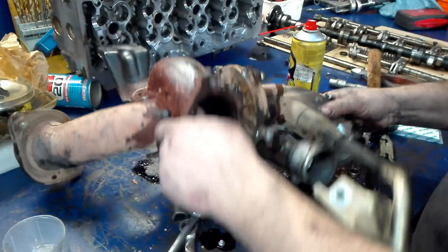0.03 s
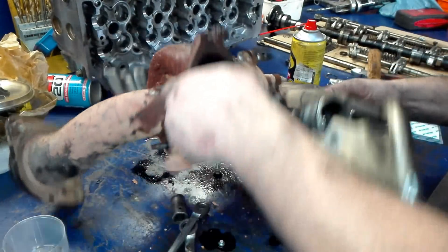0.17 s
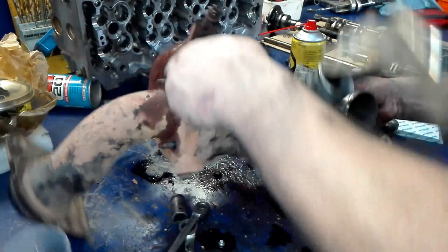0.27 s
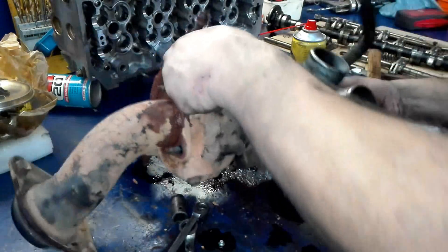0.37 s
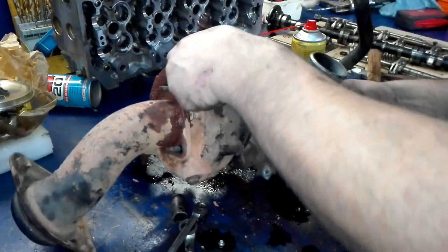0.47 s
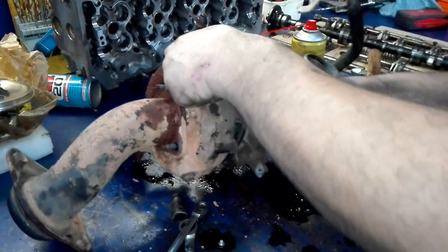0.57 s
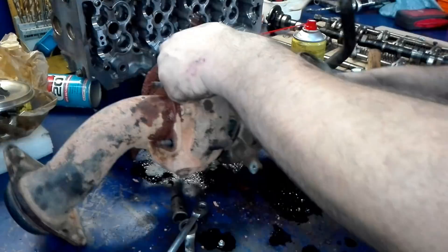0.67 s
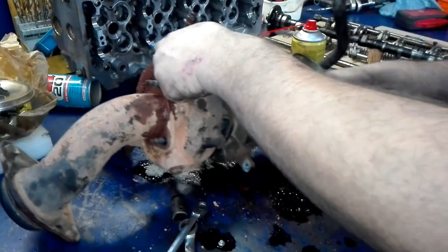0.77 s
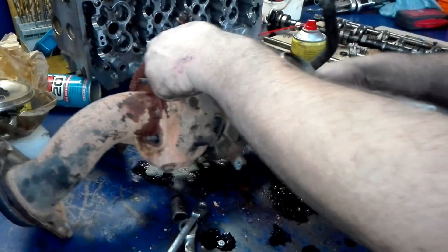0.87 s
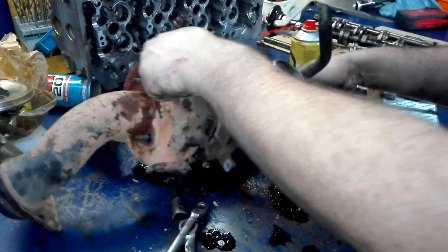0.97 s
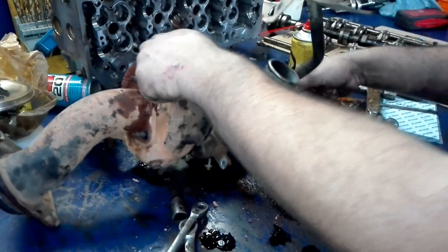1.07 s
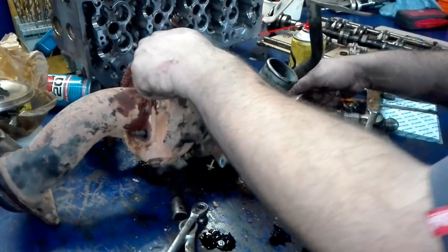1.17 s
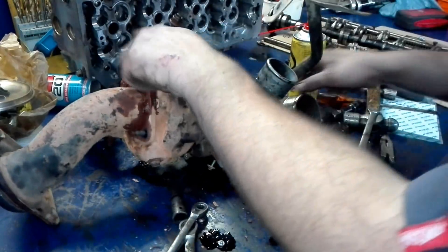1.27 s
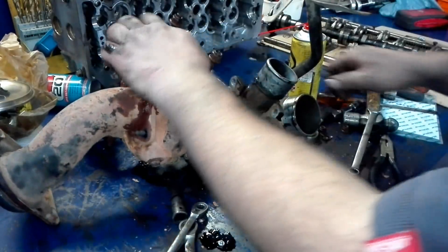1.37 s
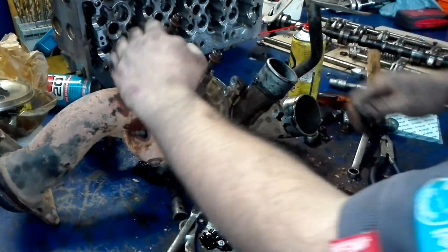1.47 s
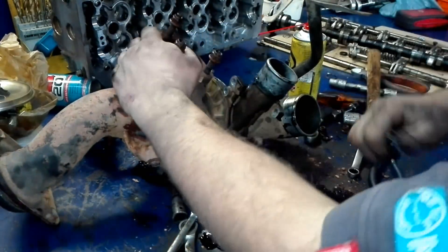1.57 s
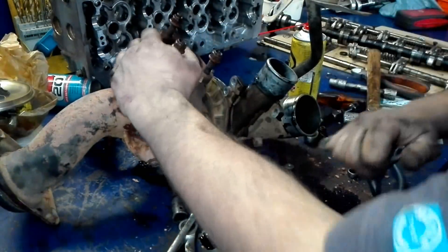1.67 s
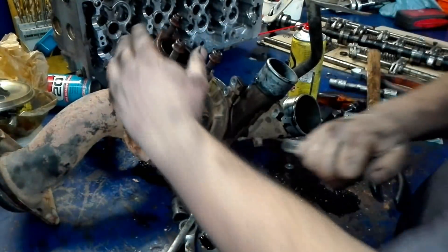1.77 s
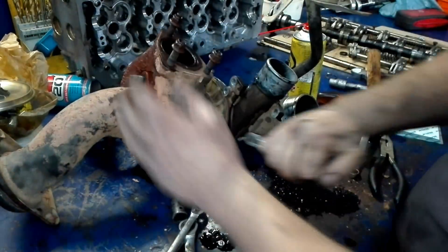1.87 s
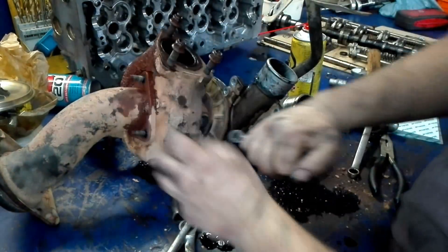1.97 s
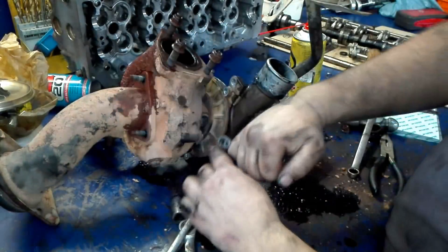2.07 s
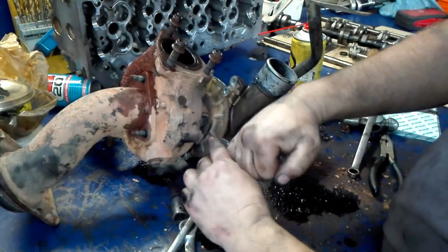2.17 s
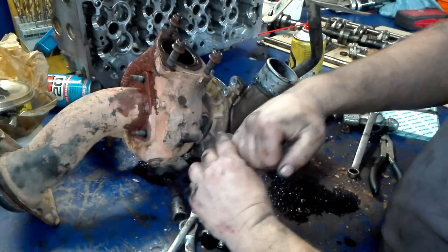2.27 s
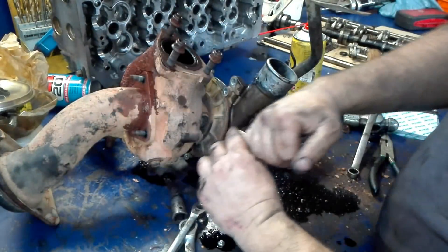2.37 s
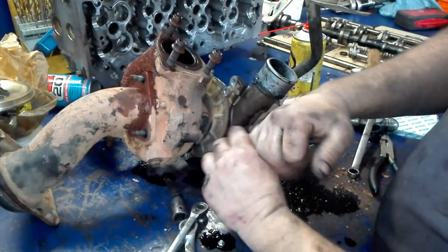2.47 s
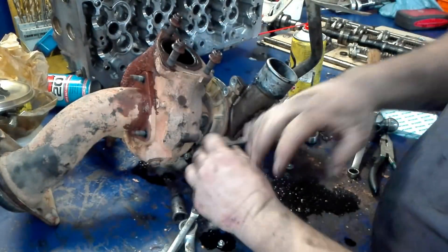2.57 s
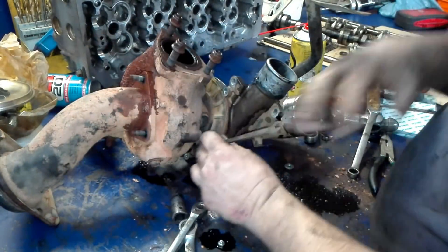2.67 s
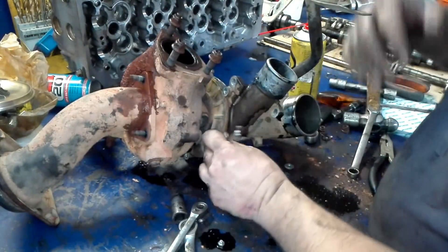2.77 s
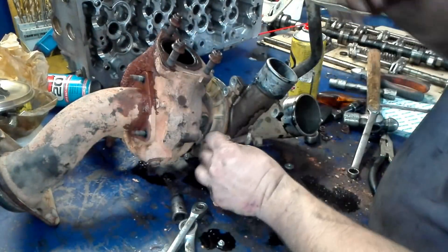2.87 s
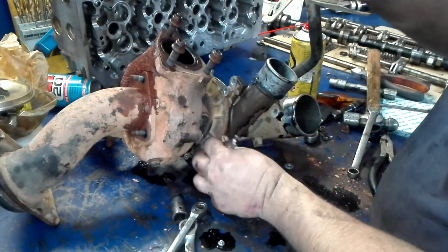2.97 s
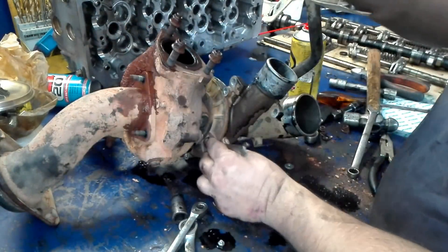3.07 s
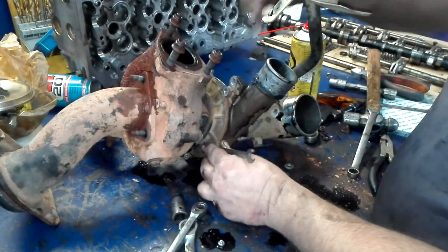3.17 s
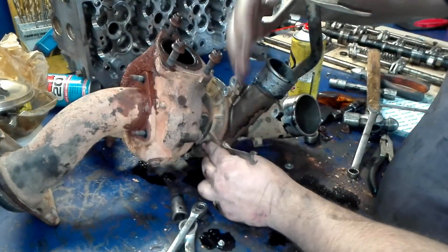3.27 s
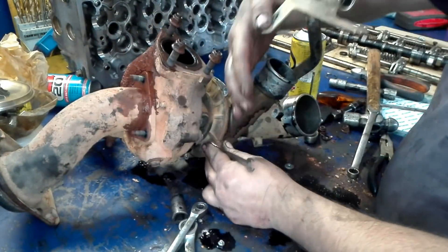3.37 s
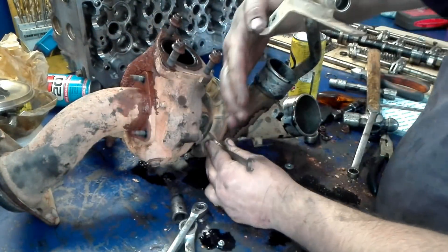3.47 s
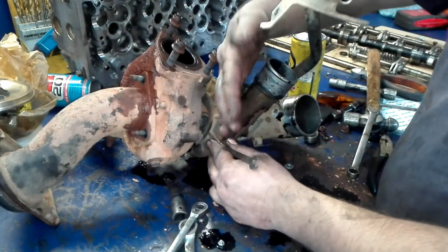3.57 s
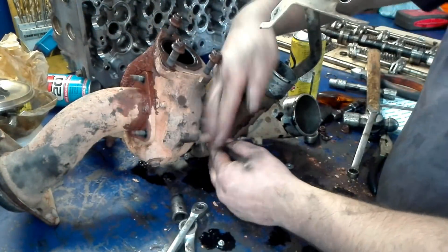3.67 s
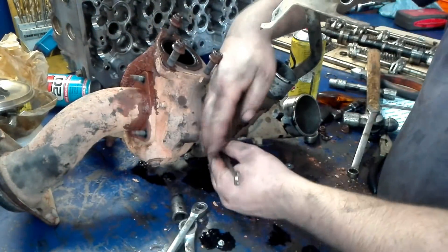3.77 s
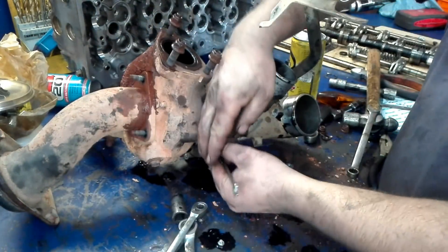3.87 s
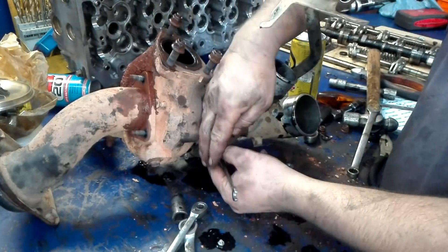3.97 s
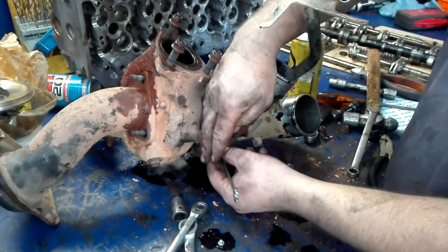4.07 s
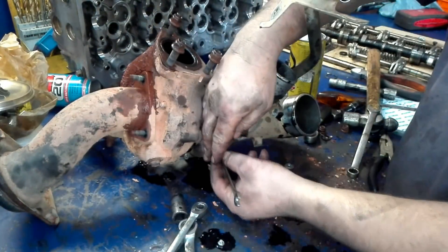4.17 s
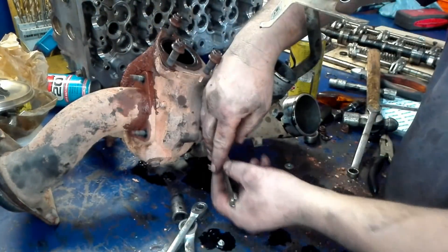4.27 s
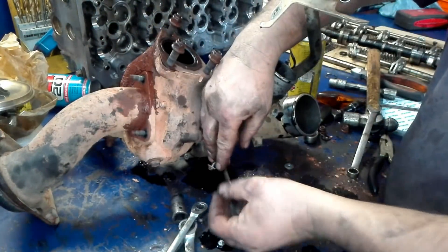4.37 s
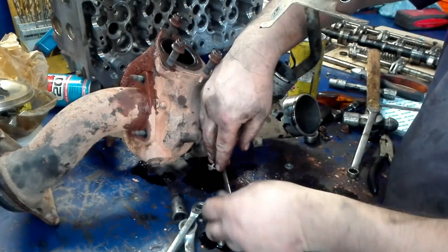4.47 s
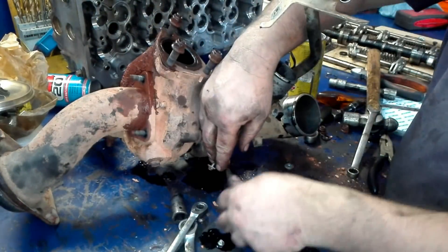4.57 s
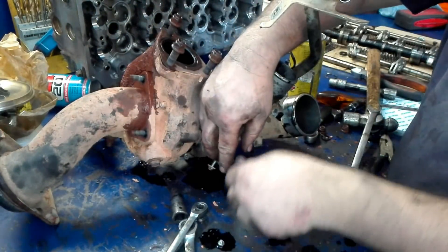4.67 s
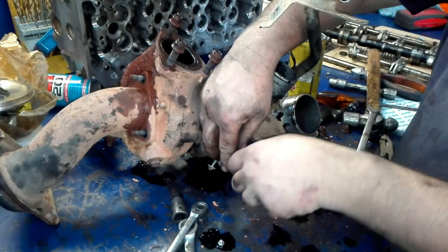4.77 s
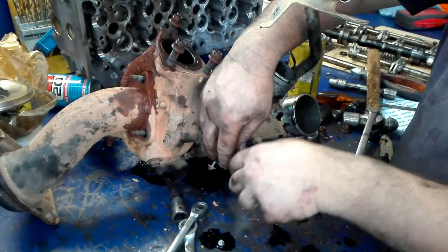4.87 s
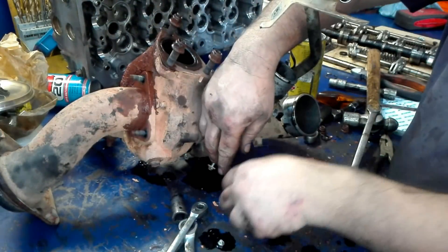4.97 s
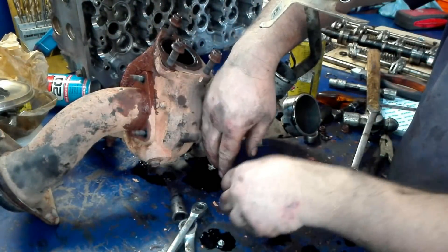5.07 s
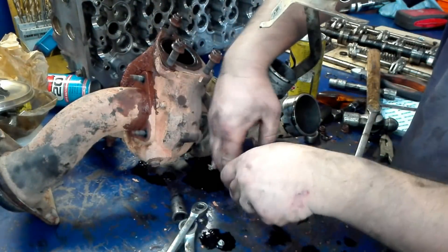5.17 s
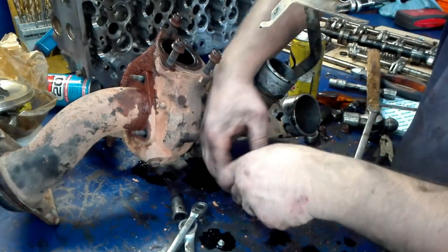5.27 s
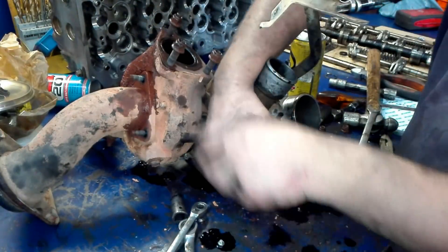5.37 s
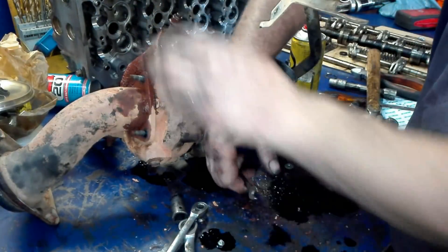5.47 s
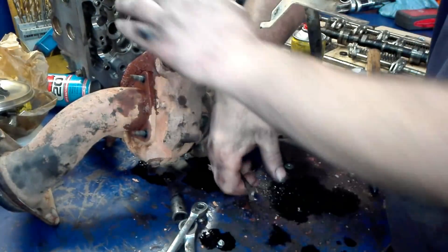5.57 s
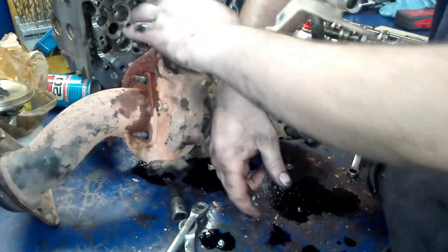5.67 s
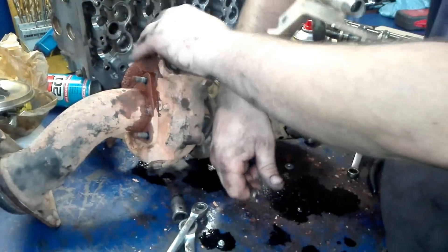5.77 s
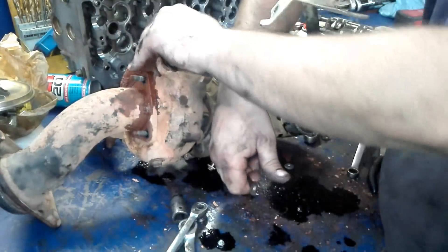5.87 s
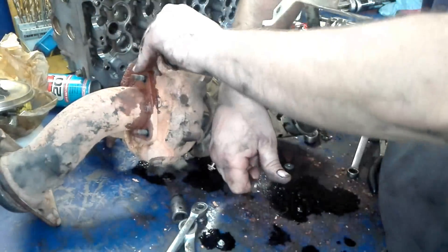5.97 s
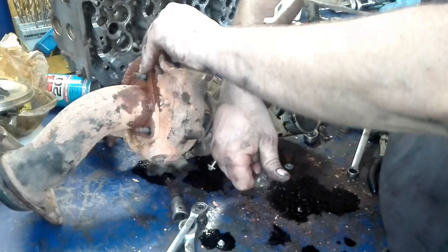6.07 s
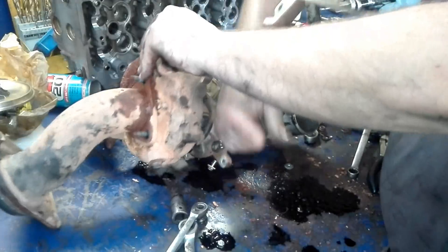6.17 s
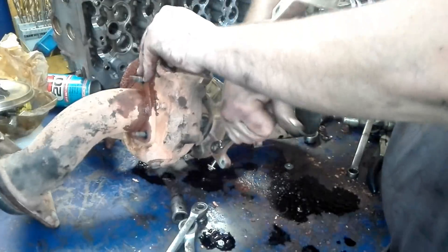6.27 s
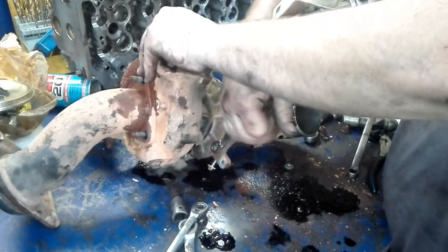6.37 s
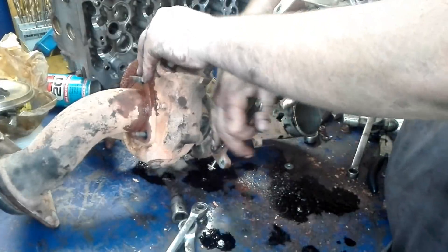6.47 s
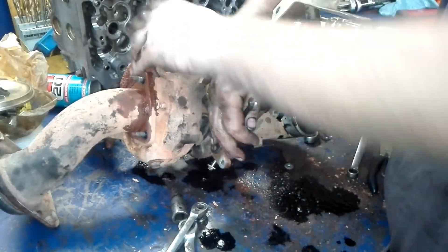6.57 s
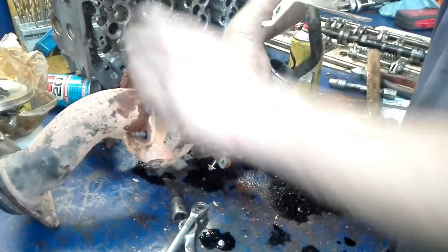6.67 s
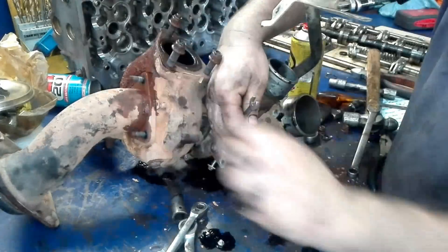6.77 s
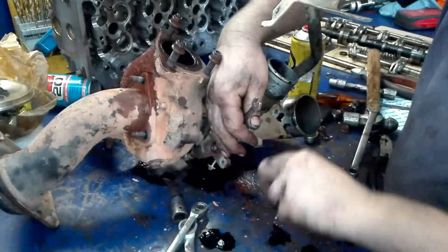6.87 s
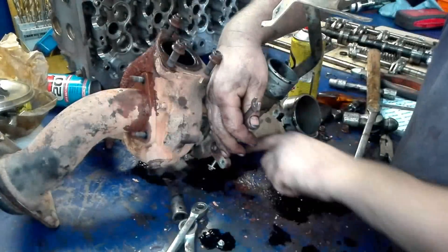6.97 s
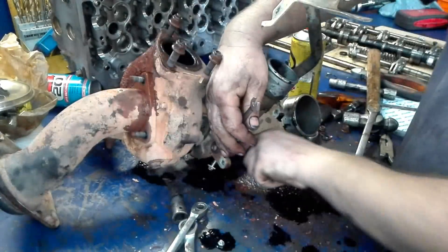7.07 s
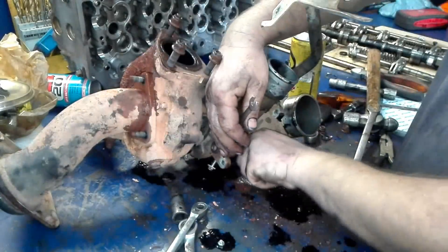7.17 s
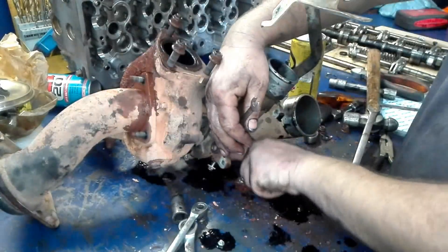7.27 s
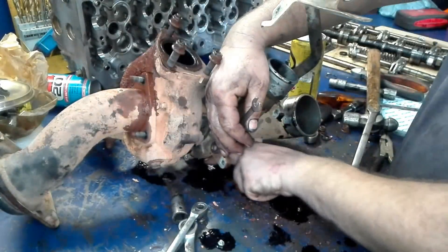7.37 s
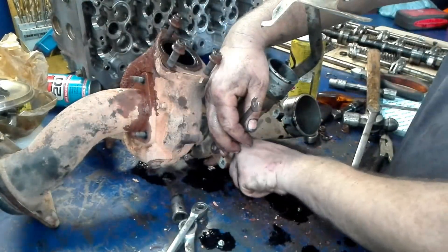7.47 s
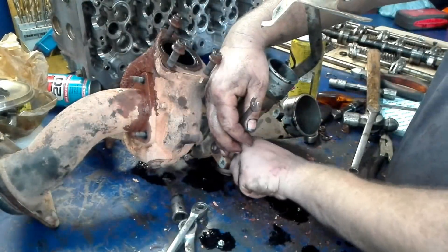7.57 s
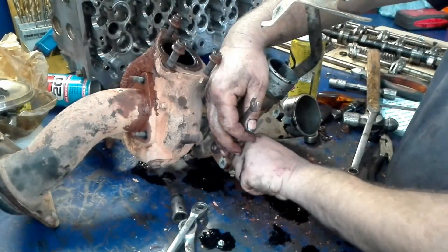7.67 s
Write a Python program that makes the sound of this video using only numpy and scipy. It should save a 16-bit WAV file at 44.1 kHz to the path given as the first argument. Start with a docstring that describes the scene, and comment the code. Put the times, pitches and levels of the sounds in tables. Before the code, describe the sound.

A heavy cast-iron housing is dragged over a workbench, grinding, knocking and landing twice with ringing clashes and low booms. After a lull with faint sleeve rustle come light spanner taps, soft bumps and tiny bolt clicks. The housing rocks and bangs down once more, and a tool clacks farther off. The microphone is close, in a quiet, hard-walled workshop with a short echo.

```python
"""A hard-walled workshop, with a small microphone close to the workbench.
A cast-iron turbo housing is dragged, tipped over and dropped: it grinds as it sticks and slips, each
landing clashes and rings, and the bench top booms under the blows. Then a spanner and bolts tap on it,
the housing rocks and bangs down once more, and a tool clacks farther off. The walls answer."""
import sys
import numpy as np
from scipy import signal
from scipy.fft import rfft, irfft, next_fast_len
from scipy.io import wavfile
from scipy.ndimage import uniform_filter1d, map_coordinates

SR = 44100
rng = np.random.default_rng(int(sys.argv[2]) if len(sys.argv) > 2 else 0)


def bounce(signal):
    """Save signal as a 16-bit WAV file at the path given by the first command-line argument."""
    frames = np.transpose(np.atleast_2d(signal))
    limited = np.clip(frames, -1, 1)
    pcm = np.round(limited * 32767).astype(np.int16)
    wavfile.write(sys.argv[1], SR, pcm)


N = 340893


def amp(db):
    return 10 ** (np.asarray(db) / 20)


def unit(x):
    return x / np.sqrt(np.mean(x ** 2) + 1e-20)


def unit_attack(x):
    """Scale a blow to rms 1 over its first 20 ms."""
    return x / np.sqrt(np.mean(x[..., :SR // 50] ** 2) + 1e-20)


def along(points, hz):
    """Interpolate (Hz, value) points on a log frequency axis."""
    knots_hz, values = np.transpose(points)
    return np.interp(np.log(hz + 1), np.log(knots_hz + 1), values)


def filtered(x, response):
    """Apply a gain given as a function of frequency."""
    size = x.shape[-1]
    padded = next_fast_len(size + 8192)
    hz = np.fft.rfftfreq(padded, 1 / SR)
    return irfft(rfft(x, padded) * response(hz), padded)[..., :size]


def noise(colour, size=N):
    """Mid and side noise of rms 1; colour gives dB for each frequency."""
    return unit(filtered(rng.standard_normal((2, size)), lambda hz: amp(colour(hz))))


def wobble(rate):
    """A smooth random curve, rate knots a second."""
    knots = rng.standard_normal(int(N * rate / SR) + 4)
    return map_coordinates(knots, [np.arange(N) * rate / SR])


def treble(hz, db):
    """A slope above 2.5 kHz that reaches db near 6 kHz."""
    return db * 0.54 * np.log1p((hz / 2500) ** 2)


def dying(colour, t60s):
    """One second of coloured noise; each frequency dies at its own speed."""
    hz, t, bands = signal.stft(noise(colour, size=SR), SR, nperseg=128)
    decay = amp(-60 * t / along(t60s, hz)[:, None])
    return signal.istft(bands * decay, SR, nperseg=128)[1][:, :SR]


def burst(spectrum, t60s):
    """The noise of one blow, from (Hz, dB) and (Hz, seconds) points."""
    return unit_attack(dying(lambda hz: along(spectrum, hz), t60s))


def ring(modes, scatter_db, colour=np.zeros_like):
    """One second of damped modes, at new strengths for each blow."""
    hz, db, t60 = np.transpose(modes)
    t = np.arange(SR) / SR
    gains = amp(db + colour(hz) + scatter_db * rng.standard_normal((2, len(hz))))
    partials = np.sin(2 * np.pi * hz[:, None] * t) * amp(-60 * t / t60[:, None])
    return unit_attack(gains @ partials)


def swell(x, rise_s):
    """Let a sound build up with time constant rise_s."""
    return x * (1 - np.exp(-np.arange(x.shape[-1]) / SR / rise_s))


def push(s, build_up_s, let_go_s):
    """Effort that grows exponentially to 1 at time s and then dies away."""
    t = np.arange(N) / SR - s
    return np.exp(-np.maximum(-t / build_up_s, t / let_go_s))


def add(track, s, sound):
    """Mix a sound in at time s."""
    part = track[:, round(s * SR):][:, :sound.shape[1]]
    part += sound[:, :part.shape[1]]


# The walls around the bench. Each row: frequency in Hz, time to fall 60 dB (t60) in seconds.
SHOP_DECAY = [(60, 0.92), (200, 0.56), (700, 0.64293), (1500, 0.76), (4000, 0.68), (7000, 0.45),
              (12000, 0.17)]

def in_shop(x, wet_db):
    """The direct sound reaches the microphone, and a diffuse tail builds up as the walls answer."""
    tail = swell(dying(lambda hz: treble(hz, -2.5), SHOP_DECAY), rise_s=0.004)
    tail /= np.linalg.norm(tail[0])
    return x + amp(wet_db) * signal.fftconvolve(x, tail, axes=1)[:, :x.shape[1]]


# The quiet shop around the microphone. Each row: frequency in Hz, relative density in dB.
ROOM_SPECTRUM = [(12, -28), (20, 6.5), (64, -4.5), (82, -13.5), (118, -11.5), (357, -25.5), (398, -27.5),
                 (638, -30.5), (841, -31.5), (1210, -27.5), (1420, -31), (3270, -33.5), (3760, -33.5),
                 (13400, -39.5), (15000, -54.5)]

def room_tone():
    """Low wavering rumble and faint hiss."""
    air = noise(lambda hz: along(ROOM_SPECTRUM, hz))
    rumble = filtered(air, lambda hz: 1 / (1 + (hz / 200) ** 4))
    return amp(-52.5) * (air + rumble * (amp(wobble(2.2)) - 1))


# Sleeves and hands at the bench. Each row: centre in seconds, level in dB, half-width in seconds.
SLEEVE_STROKES = [(1.563, -63.5, .04), (2.002, -64.5, .22), (3.2, -64, 0.0506), (3.545, -63.5, .08),
                  (3.682, -66, 0.091), (5.24, -68, 0.192), (6.569, -64, .04)]
# Their soft hiss. Each row: frequency in Hz, relative density in dB.
SLEEVE_SPECTRUM = [(300, -9), (700, -2), (1300, 2.5), (2500, -4), (5000, -5.5), (8000, -12), (14000, -25)]

def rustle():
    """Soft swells of cloth and skin sliding over the parts."""
    t = np.arange(N) / SR
    strokes = sum(amp(db) * np.exp(-((t - s) / width) ** 2) for s, db, width in SLEEVE_STROKES)
    return strokes * amp(0.83 * wobble(30)) * noise(lambda hz: along(SLEEVE_SPECTRUM, hz))


# A tool put down farther from the microphone. Each row: start in seconds, relative level in dB.
TOOL_CLACKS = [(7.622, -42.5), (7.629, -36.5), (7.635, -35.5), (7.647, -36.5), (7.656, -42.5)]
# Its clack. Each row: frequency in Hz, relative density in dB.
TOOL_SPECTRUM = [(210, -32), (350, -15), (768, 0.5), (1190, -11), (1420, -3.5), (2170, -13.5), (2500, -8.5),
                 (2790, -12.5), (3060, -11.5), (4540, -15.5), (7160, -14), (9360, -22), (13600, -40),
                 (14300, -35), (15000, -61.5)]
# Its ring. Each row: frequency in Hz, relative level in dB, t60 in seconds.
TOOL_MODES = [(688.7, 5, 0.03), (782, -21, 0.041), (1365, -8, 0.082), (1480, -5, 0.048), (1818, 0.5, 0.031),
              (3138, -7, 0.11), (6230, -12, 0.13), (7169, -16, .07)]

def tool_down():
    """A tool settles in a quick run of hollow clacks."""
    out = np.zeros((2, N))
    for s, db in TOOL_CLACKS:
        clack = amp(-0.5) * burst(TOOL_SPECTRUM, t60s=[(1000, 0.066), (12000, 0.048)])
        ringing = amp(-6) * ring(TOOL_MODES, scatter_db=3)
        add(out, s, amp(db) * swell(clack + ringing, rise_s=0.00187))
    return in_shop(out, wet_db=-11)


# Small bolts click together on the bench. Each row: start in seconds, relative level in dB.
BOLT_CLICKS = [(5.019, -43), (5.0511, -46), (6.1816, -53.5), (6.198, -56.5)]
# One click. Each row: frequency in Hz, relative density in dB.
BOLT_SPECTRUM = [(1470, -57), (2500, -33.5), (2900, -22.5), (3200, -21), (4070, -16.5), (4690, 3),
                 (5970, -14.5), (6980, -4), (9280, -25), (10000, -12.5), (10700, -7), (14600, -22.5),
                 (15000, -33.5)]

def bolts():
    """Tiny steel contacts, too damped to hold a pitch."""
    out = np.zeros((2, N))
    for s, db in BOLT_CLICKS:
        add(out, s, amp(db - 4.5) * burst(BOLT_SPECTRUM, t60s=[(4000, 0.031), (12000, 0.036)]))
    return in_shop(out, wet_db=-13)


# Steel taps the casting, close by. Each row: start in seconds, relative level in dB, treble in dB.
SPANNER_TAPS = [(0.3127, -20.5, -0.5), (0.3632, -19.5, 1.5), (0.37, -24.5, 3), (2.953, -37.5, -8.5),
                (3.222, -46.5, -9), (3.9356, -38.5, 6), (3.940, -44.5, 9), (4.213, -62, 6), (4.322, -57, 0),
                (4.740, -55, 2.5), (4.7631, -54, 7.5)]
# The tick of contact. Each row: frequency in Hz, relative density in dB.
TICK_SPECTRUM = [(300, -8), (850, -18), (1350, 0), (2100, -17.5), (3300, -6.5), (6800, -11.5),
                 (9000, -25.5), (14000, -34)]
# The ring each tap sets off, loudest in the casting near 1.35 kHz. Each row: frequency in Hz, relative level in
# dB, t60 in seconds.
TAP_MODES = [(397, -8.5, 0.24), (532, -9.5, .07), (1260, -8.5, 0.0083), (1350, -2, .028),
             (1370, 8, 0.035), (1830, -9, .025), (3090, -8, 0.023), (4360, -7, 0.062),
             (5100, -5.5, 0.045), (6700, -7.5, 0.0083), (6420, -0.5, .035), (11000, -17, .02)]

def spanner():
    """Taps of hand-damped steel on the casting: a tick and a brief ring."""
    out = np.zeros((2, N))
    for s, db, treble_db in SPANNER_TAPS:
        tick = burst(TICK_SPECTRUM, t60s=[(300, 0.0667), (8000, 0.052)])
        tap = swell(0.5 * tick + ring(TAP_MODES, scatter_db=2.5), rise_s=0.0011)
        add(out, s, amp(db - 3) * filtered(tap, lambda hz: amp(treble(hz, treble_db))))
    return in_shop(out, wet_db=-14)


# The dragged iron catches on the bench top. Each row: peak time in seconds, level in dB.
CATCHES = [(.045, -34), (.165, -25.5), (.3, -29), (.385, -30)]

def groan():
    """Stick-slip locks loosely on to one bench mode and its overtone."""
    effort = sum(amp(db) * push(s, build_up_s=0.012, let_go_s=0.051) for s, db in CATCHES)
    pitch_hz = 226 * (1 + 0.073 * wobble(70))
    phase = 2 * np.pi * np.cumsum(pitch_hz) / SR
    tone = np.sin(phase) + amp(-12.5) * np.sin(2 * phase)
    return effort * unit(tone * amp(3.6 * wobble(68)))


# The iron is pushed along the bench, close to the microphone. Each row: time of the hardest push in
# seconds, relative grind and grit levels in dB, build-up and let-go in seconds.
PUSHES = [(.075, -37.5, -34, .035, .012), (0.331, -27.5, -28.5, 0.16, 0.11), (.47, -35, -33.5, 0.0092, .1),
          (.668, -42.5, -40, .05, 0.027), (0.783, -23, -21.5, 0.016, .02), (.935, -31, -40.5, .012, 0.2),
          (.992, -41, -29.5, 0.0035, .1), (3.61, -55, -78, .05, .08), (3.92, -52, -70, .02, .13),
          (5.79, -57.5, -48.5, .012, .04), (5.903, -34.5, -59, .001, .022), (6.105, -51, -63, .05, .05),
          (6.21, -48.5, -58.5, .02, .01)]
# Grind, grit and the bench top's rumble. Each row: frequency in Hz, relative density in dB.
GRIND_SPECTRUM = [(150, -31), (250, -2), (367, -12), (434, -5.5), (551, -15.5), (644, -12), (917, -15),
                  (1310, -12), (1820, -21.5), (2360, -22), (3000, -27), (3900, -53.5), (6600, -120)]
GRIT_SPECTRUM = [(1470, -40), (2500, -5.5), (3530, -3.5), (4190, -5), (6880, -1), (11500, -16),
                 (14000, -17), (14700, -25.5), (15000, -50.5)]
RUMBLE_SPECTRUM = [(25, -22.5), (60, -2.5), (130, 0.5), (200, -11.5), (400, -41.5)]

def scraping():
    """Rusty iron sticks and slips: an uneven grind with sharp grit on top and a rumble below."""
    grind_level, grit_level = np.zeros((2, N))
    for s, grind_db, grit_db, build_up_s, let_go_s in PUSHES:
        effort = push(s, build_up_s, let_go_s)
        grind_level += amp(grind_db) * effort
        grit_level += amp(grit_db) * effort ** 1.7  # grit rises faster than the push
    slips = unit(amp(2.8 * wobble(170)))
    grains = (rng.random(N) < 5000 / SR) * rng.standard_normal((2, N))  # about 5000 a second
    grit = amp(-2) * grit_level * unit(filtered(grains, lambda hz: amp(along(GRIT_SPECTRUM, hz))))
    grind = amp(-1) * grind_level * noise(lambda hz: along(GRIND_SPECTRUM, hz))
    rumble = amp(-2) * grind_level * noise(lambda hz: along(RUMBLE_SPECTRUM, hz))
    return in_shop(rumble + slips * (grind + grit), wet_db=-9)


# Iron meets the bench, heard close up. Each row: frequency in Hz, relative density in dB.
CLASH_SPECTRUM = [(180, -32), (300, -3), (459, -1.5), (559, -2), (658, -3), (913, -5.5), (1470, -3),
                  (2360, -14), (3330, -10), (4690, -14), (6950, -11.5), (8190, -18), (10500, -16.5),
                  (14000, -34), (15000, -42)]
# How that clash dies. Each row: frequency in Hz, t60 in seconds.
CLASH_DECAY = [(200, 0.089), (1400, 0.11), (5000, 0.12), (14000, 0.019)]
# The housing and the bench top ring. Each row: frequency in Hz, relative level in dB, t60 in seconds.
IRON_MODES = [(732, -8, 0.27), (1240, -3, 0.074), (1294, -5, .16), (1397, 0, 0.24), (1443, 3.5, 0.27),
              (2780, -4, 0.051), (2570, -2, 0.13), (3450, -4.5, 0.12), (3560, -6.5, 0.035),
              (4196.4, -4, 0.04), (5293, -5.5, .1), (6110, -2.5, 0.27), (7280, -1.5, 0.15)]
BENCH_MODES = [(62, -5.5, 0.7), (89.3, -9.5, 0.17), (103, -3.5, 0.38), (123.3, -0.5, 0.17),
               (151.6, -3.5, 0.28), (197, -6.5, 0.53), (215.2, 4.5, 0.09), (309, -6.5, 0.17),
               (361, -12, 0.86), (443.1, -9, 0.17)]

def landing(clash_db, treble_db, thud_db, thud_hz, damping_s):
    """Each landing is a gritty clash, a short iron ring and a boom of the bench top."""
    rise_s = 0.00025 * amp(-0.45 * clash_db)  # gentle landings press in more slowly
    clash = filtered(burst(CLASH_SPECTRUM, CLASH_DECAY), lambda hz: amp(treble(hz, treble_db)))
    iron = ring(IRON_MODES, scatter_db=3, colour=lambda hz: treble(hz, treble_db))
    metal = amp(clash_db) * swell(amp(2) * clash + amp(-11.5) * iron, rise_s)
    # where the weight lands decides which bench modes take it up
    boom = ring(BENCH_MODES, scatter_db=3.46, colour=lambda hz: -15 * np.abs(np.log2(hz / thud_hz)))
    boom = unit_attack(boom * np.exp(-np.arange(SR) / SR / damping_s))
    # trim the deepest bass from the boom
    boom = filtered(boom, lambda hz: 1j * hz / (1j * hz + 25))
    thud = amp(thud_db) * swell(boom, 0.87 * rise_s)
    return in_shop(metal, wet_db=-13.5) + in_shop(thud, wet_db=-11.5)


# The housing is nudged or set down gently, near the microphone.
# Each row: start in seconds, thud level in dB, thud centre in Hz.
SOFT_LANDINGS = [(.076, -17.5, 224), (.153, -25, 160.1), (.272, -23.5, 114.9), (.629, -27, 117.9),
                 (.7156, -20.5, 105), (.756, -17, 119), (.7804, -17, 125), (.9192, -21, 118.4),
                 (2.955, -41.5, 249.7), (3.550, -38, 129.7), (3.611, -36.5, 130), (3.888, -33, 124.6),
                 (3.937, -35, 118), (4.050, -33, 134.2), (4.59, -47.5, 170.8), (5.13, -46, 167.8),
                 (5.505, -41.5, 135.3), (5.7399, -26, 225), (5.900, -24.5, 74.5)]

def bumps():
    """Single soft contacts, while a hand on the housing damps the bench top."""
    out = np.zeros((2, N))
    for s, thud_db, thud_hz in SOFT_LANDINGS:
        octaves = np.log2(thud_hz / 128)  # above an ordinary bump
        clash_db = thud_db - 15 - 5.5 * octaves  # the full weight grinds harder than an edge
        treble_db = -13 + 11 * octaves  # a shorter contact thuds higher and is brighter
        add(out, s, landing(clash_db, treble_db, thud_db, thud_hz, damping_s=0.07))
    return out


# The housing falls right in front of the microphone. Each row: start in seconds, clash level in dB,
# treble in dB; the first landing's extra clash in dB, thud in dB, thud centre in Hz and damping time in
# seconds; the rebounds' thud against clash in dB, count (rounded), gap in seconds and loss each in dB.
FALLS = [(.4313, -15.5, 1, 2.5, -7, 64.3, 0.25, 1, 3, .0145, 2.5),
         (0.9952, -15.5, -0.5, 0, -3, 87.9, .4, -1, 4, .0182, 0.67),
         (6.2142, -13.5, 6.5, -7, -12, 71.66, .03, 4.5, 3.5, .0134, 5.5)]

def crashes():
    """The weight lands first, then the housing chatters in a quick run of weakening rebounds."""
    out = np.zeros((2, N))
    treble_per_db = 0.48  # a harder contact is brighter
    for s, clash_db, treble_db, extra_db, thud_db, thud_hz, damping_s, *chatter in FALLS:
        first_treble_db = treble_db + treble_per_db * extra_db
        add(out, s, landing(clash_db + extra_db, first_treble_db, thud_db, thud_hz, damping_s))
        rebound_thud_db, count, gap_s, loss_db = chatter
        for k in range(1, round(count) + 1):
            lost_db = k * loss_db
            db = clash_db - lost_db
            # short rebounds drive the higher bench modes, and the settling weight damps them
            rebound = landing(db, treble_db - treble_per_db * lost_db, db + rebound_thud_db,
                              thud_hz=232, damping_s=0.05)
            jitter_s = 0.0004 * rng.standard_normal()
            add(out, s + k * gap_s + jitter_s, rebound)
    return out


# Stereo width at the microphone. Each row: frequency in Hz, side against mid in dB.
STEREO_WIDTH = [(3500, -65.5), (4500, -24.5), (5500, -16), (14000, -4.5)]

def scene():
    """Everything is heard almost in mono; only the treble above about 4.5 kHz is wide."""
    housing = crashes() + bumps() + scraping() + groan()
    mid, side = housing + spanner() + bolts() + tool_down() + rustle() + room_tone()
    side = filtered(side, lambda hz: amp(along(STEREO_WIDTH, hz)))
    return np.array([mid + side, mid - side])


def suppress(x, depth_db, threshold_db, knee_db):
    """Noise suppression: each band is turned down while it stays close to its own steady level."""
    bands = signal.stft(x, nperseg=512)[2]
    power = np.abs(bands.mean(axis=0)) ** 2
    power = uniform_filter1d(power, size=5, axis=0)  # smooth across frequency
    power = np.abs(uniform_filter1d(power, size=3, axis=1)) + 1e-20  # and across time
    above_db = 10 * np.log10(power / np.median(power, axis=1, keepdims=True))
    shut = (1 - np.tanh((above_db - threshold_db) / knee_db)) / 2
    return signal.istft(bands * amp(-depth_db * shut), nperseg=512)[1][:, :N]


def record(dry):
    """After the microphone, steady noise is suppressed, peaks are squashed and the top treble is cut."""
    clean = suppress(dry, depth_db=6, threshold_db=9.5, knee_db=8)
    squashed = clean / (1 + np.abs(clean) ** 6) ** (1 / 6)
    return filtered(squashed, lambda hz: hz < 14600)


dry = scene()
out = record(dry)
bounce(out)
```